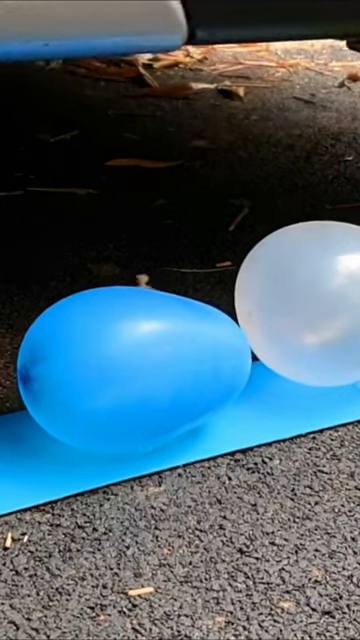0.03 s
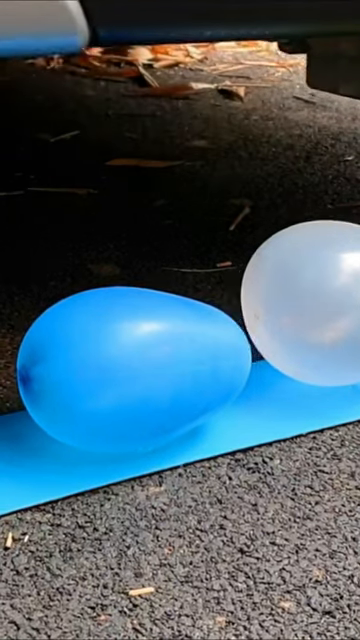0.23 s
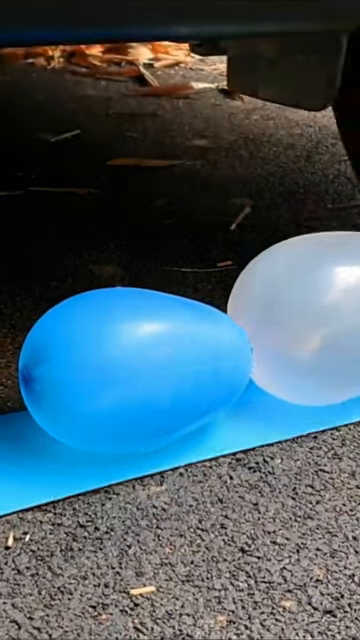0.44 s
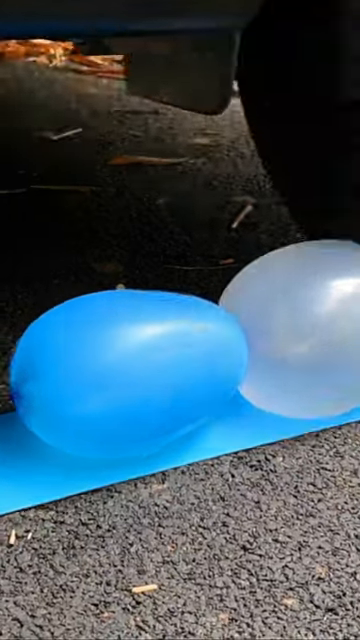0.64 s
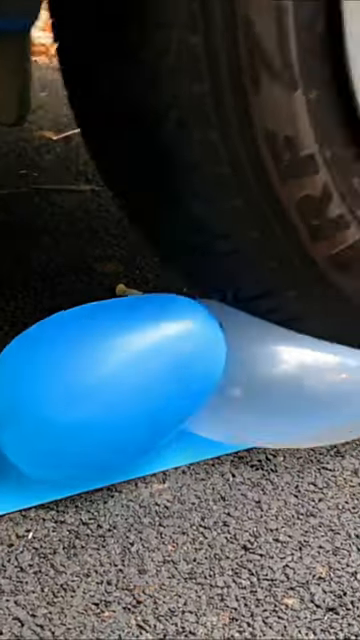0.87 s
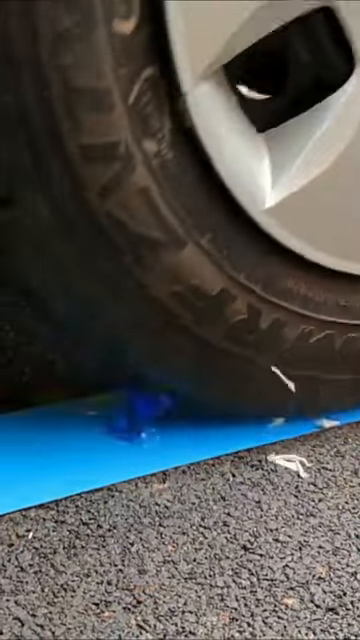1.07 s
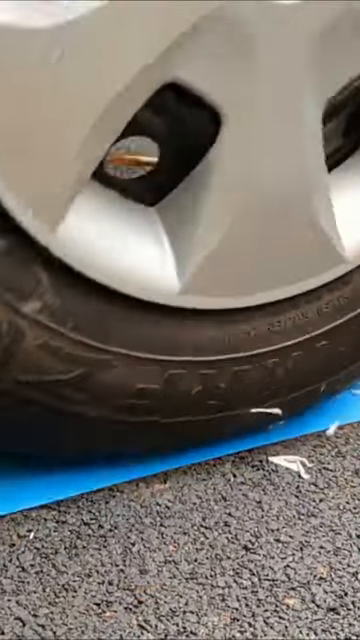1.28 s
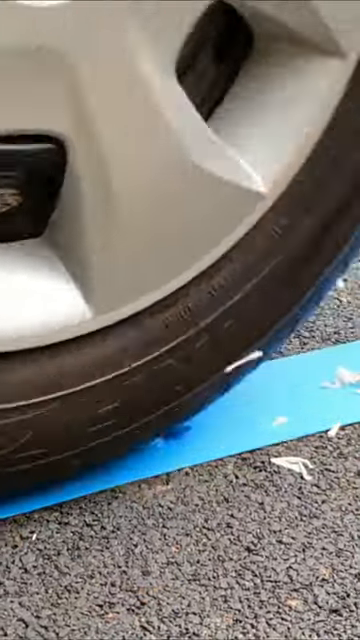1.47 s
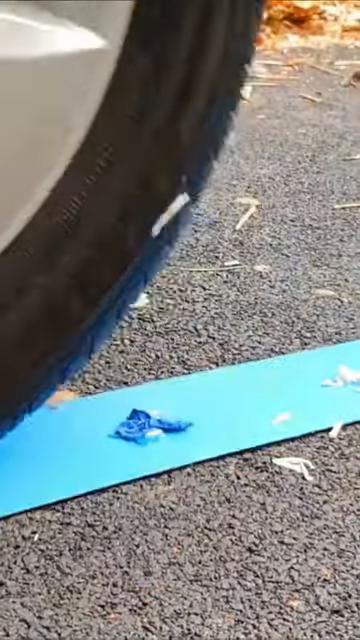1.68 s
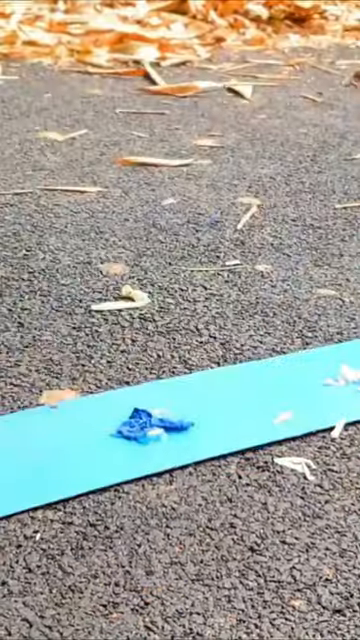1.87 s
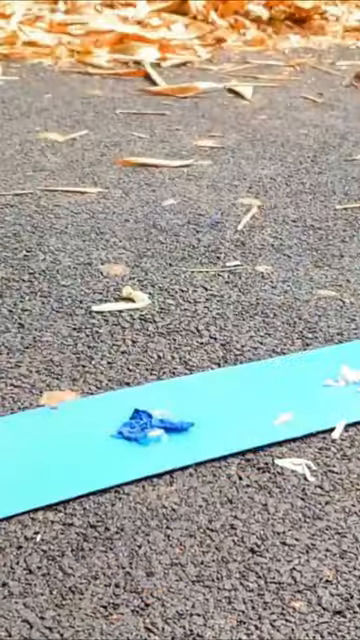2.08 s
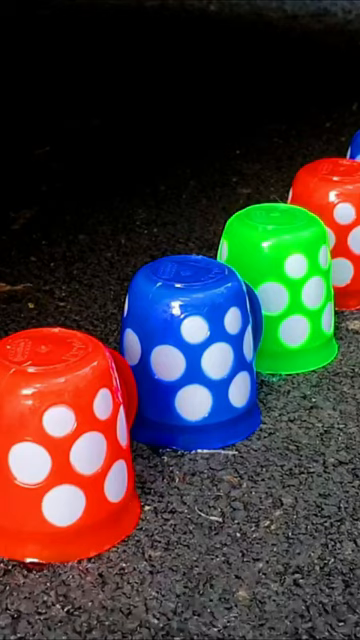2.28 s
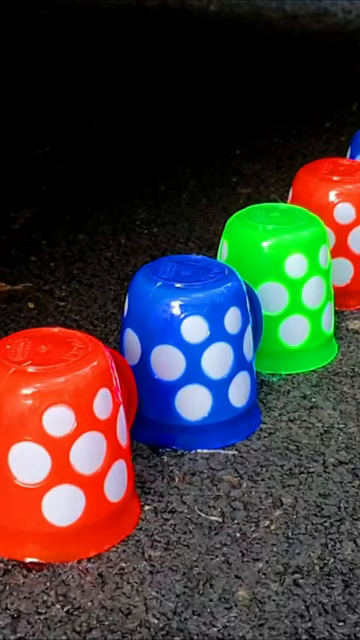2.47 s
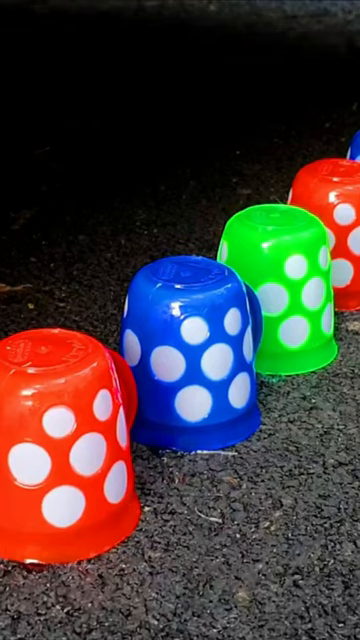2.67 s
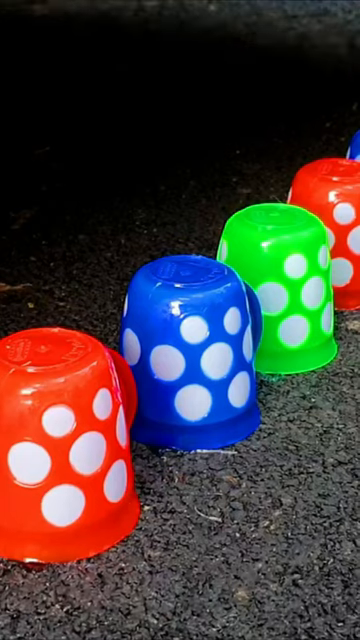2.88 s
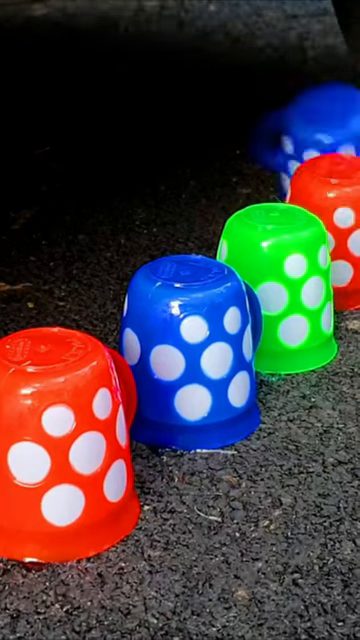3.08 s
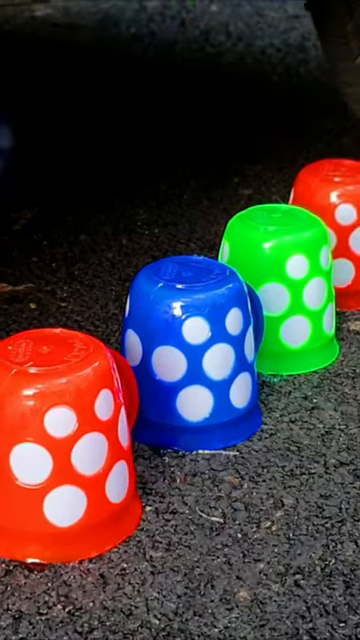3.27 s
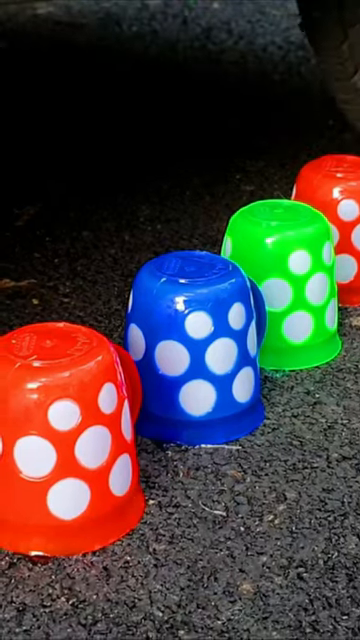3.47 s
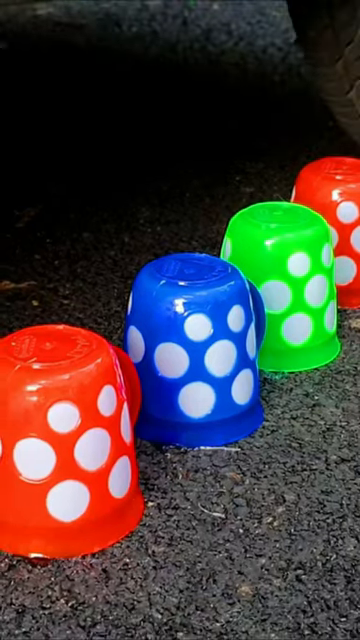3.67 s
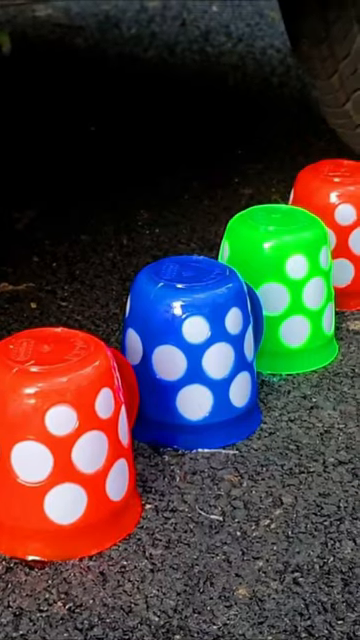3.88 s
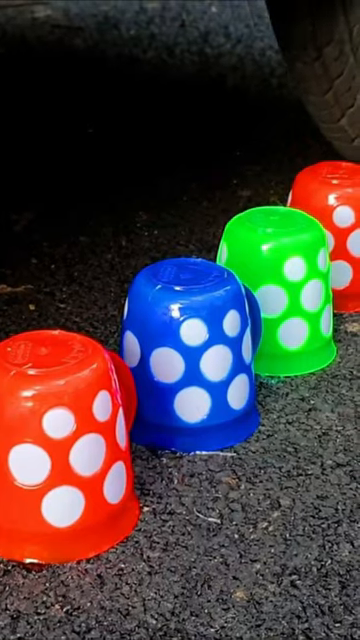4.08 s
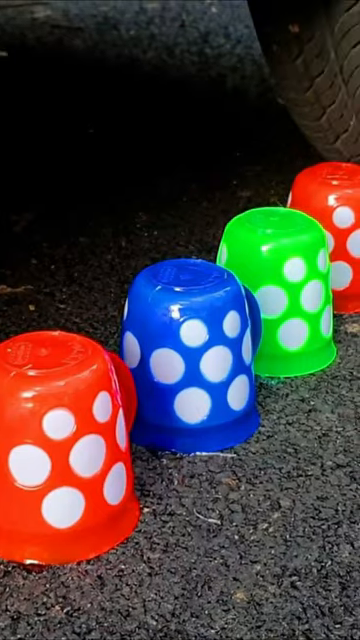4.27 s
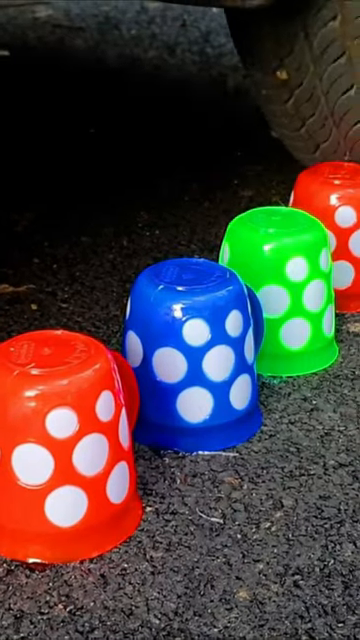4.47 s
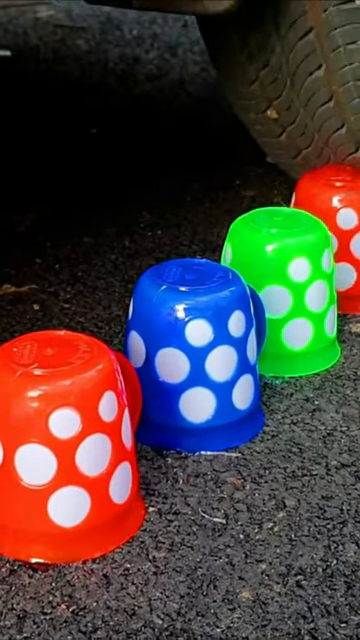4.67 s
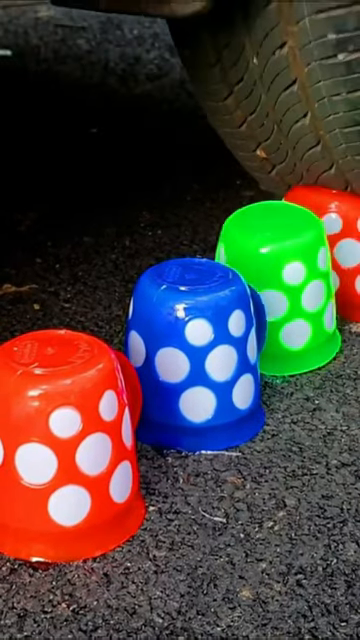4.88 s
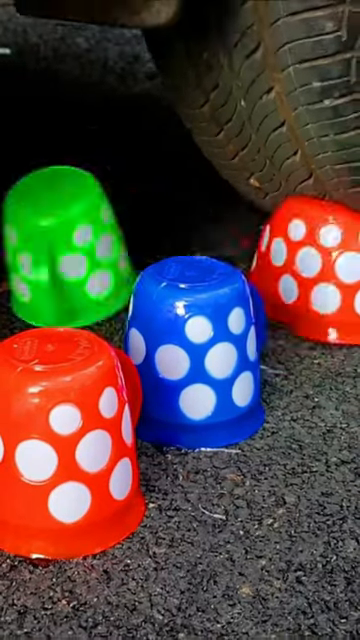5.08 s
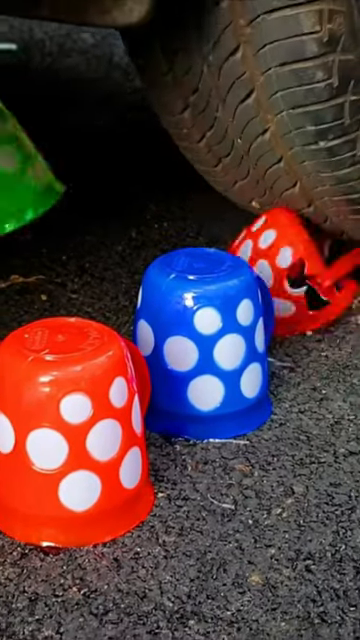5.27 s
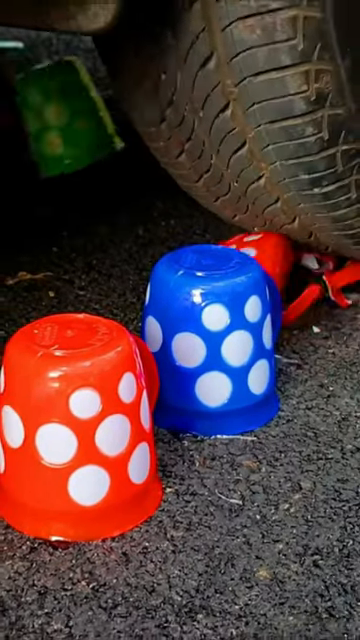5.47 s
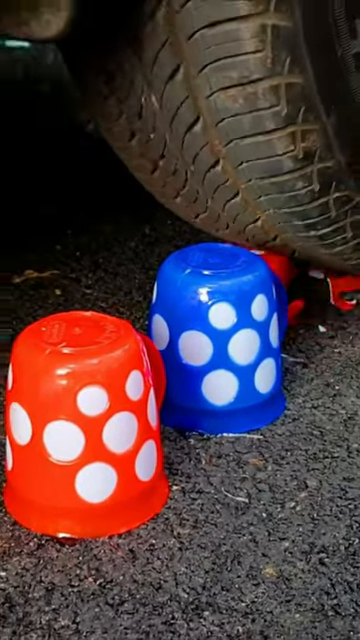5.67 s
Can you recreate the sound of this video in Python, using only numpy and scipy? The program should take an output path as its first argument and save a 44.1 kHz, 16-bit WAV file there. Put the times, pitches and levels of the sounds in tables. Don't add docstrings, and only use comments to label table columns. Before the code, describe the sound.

A low microphone beside a slowly rolling car catches soft engine throb, gritty ticks and three very loud balloon pops with limp skin slaps and thumps of air. The sound empties, cuts briefly to silence, then a stronger engine growl enters. Hard plastic crunches and snaps, loose bits knock on asphalt, and after a pause a second burst of dense cracking thins into scattered snaps as the engine revs higher.

```python
import sys
import numpy as np
from scipy import signal
from scipy.fft import rfft, irfft, next_fast_len
from scipy.io import wavfile
from scipy.ndimage import uniform_filter1d, map_coordinates

SR = 44100
rng = np.random.default_rng(int(sys.argv[2]) if len(sys.argv) > 2 else 0)


def put_to_file(sound):
    columns = np.atleast_2d(sound).T
    safe = np.clip(columns, -1, 1)
    whole_steps = np.round(safe * 32767)
    wavfile.write(sys.argv[1], SR, whole_steps.astype(np.int16))


def level_to_linear(level):
    exponent = np.asarray(level, float) / 20
    return 10 ** exponent


N = 253134
SHOT_ENDS_S, SHOT_STARTS_S = 2.358, 2.421
BLOW_LAG = 3
SIDES = np.array([[0.5], [-0.5]])

# f/Hz, level/dB
IDLING_TONE = [(13, -48.5), (22, -21), (38, -14), (64, 7), (90, -1.5), (125, 1), (150, -6), (180, -2.5),
               (205, -8.5), (228, -3), (285, -8.5), (390, -26), (500, -24), (650, -56.5), (1100, -120)]
# f/Hz, level/dB
PULLING_TONE = [(13, -33.5), (22, -32.5), (54, 0), (72, 7), (98, -5.5), (124, 1), (150, -4.5), (178, -3),
                (211, -10), (281, -11), (365, -22.5), (500, -33), (650, -53.5), (1100, -120)]
# f/Hz, level/dB
DRONE_TONE = [(250, -35.5), (420, -6.5), (516, -6), (944, -7.5), (1250, -14.5), (1600, -12), (2150, -22),
              (2800, -31), (3640, -39.5), (6160, -120)]
# f/Hz, level/dB
FAN_TONE = [(1180, -26), (1900, -3), (2900, -10), (4100, 0), (5200, -1), (7300, -17.5), (10000, -15),
            (12500, -23), (15000, -30.5)]
# f/Hz, level/dB
PIPE_TONE = [(40, -120), (70, -40), (98, -5), (112, 0), (130, -1.5), (150, -8), (175, -11), (230, -38),
             (500, -120)]
# f/Hz, likeness/0..1
LIKENESS = [(60, 1), (240, 0.39), (950, 0.61), (3770, 0.44), (15000, 0.055)]
# t/s, f/Hz
FIRING_RATE = [(1.5, 23.3), (1.85, 21.6), (2.36, 21.8), (2.42, 37.4), (2.49, 34.7), (2.67, 28.7),
               (2.76, 26.9), (2.98, 26), (3.4, 24.3), (3.8, 23.2), (4.05, 26.8), (4.18, 32.4), (4.38, 37),
               (4.65, 42.4), (4.82, 43.9), (5.74, 47)]
# t/s, exhaust level/dB, fan level/dB, drone level/dB
CAR_PASSING = [(0, -58, -70.5, -66), (.34, -59.5, -57, -67.5), (.69, -57.5, -74, -63.5),
               (1.0, -73.5, -80, -76.5), (1.35, -68, -86, -77.5), (1.75, -68.5, -88, -85),
               (1.9, -77, -90, -82.5), (2.1, -75.5, -90.5, -89), (2.25, -70.5, -86, -90),
               (2.36, -69.5, -86.5, -88.5)]
CAR_CREEPING = [(2.42, -44.5, -71.5, -61.5), (2.46, -43, -50.5, -52), (2.58, -41.5, -56, -57),
                (2.7, -45.5, -63, -59), (2.78, -47, -65.5, -57.5), (3.1, -47.5, -67, -55),
                (3.8, -61.5, -73, -68.5), (4.2, -52, -77, -68.5), (4.48, -52, -76.5, -68),
                (4.63, -52, -70, -63.5), (4.82, -52.5, -77.5, -66.5), (5.35, -53.5, -66.5, -57.5),
                (5.6, -57, -60.5, -59), (5.74, -55, -49.5, -58)]
# t/s, level/dB
THROTTLE_BOOM = [(2.42, -45), (2.54, -53), (2.66, -41), (2.735, -41), (2.775, -66.5), (4.15, -70.5),
                 (4.35, -52), (4.56, -54), (4.8, -66)]
# t/s, f/Hz, level/dB
BELT_SQUEAL = [(2.44, 2000, -80), (2.52, 1915, -65), (2.58, 1800, -72), (2.63, 1690, -64),
               (2.68, 1550, -62), (2.8, 1540, -63), (2.84, 1480, -74), (2.95, 1440, -90)]

# t/s, level/dB, body f/Hz, crack over body/dB, left-right/dB
TREAD_GRIT = [
    (.03, -51, 9500, -6, -1),
    (.229, -44, 2000, 7, 2),
    (.3115, -40, 3500, 7, -2),
    (.341, -48, 5000, -2, -3),
    (.364, -46, 4200, -2, 3),
    (.7175, -9, 2900, -12, -1),
    (1.0968, -23.5, 900, -12, 0),
    (1.0967, -16, 2414, -0.5, -2),
]
DISTANT_GRIT = [
    (1.4455, -59.5, 2320, -7.5, 6.3),
    (1.446, -59.5, 1170, -21, 2.3),
    (2.176, -72, 900, -12, 9.5),
]
# f/Hz, level/dB
CRACK_TONE = [(1060, -25), (1800, -8.5), (2500, -15), (3840, -4), (6070, -9.5), (7560, -21.5), (8280, -12),
              (11700, -21.5), (14300, -28.5), (16000, -38)]
# t/s, level/dB, f/Hz,
# length/cycles, left-right/dB
EDGE_SNAPS = [(.2312, -42, 1100, 1.8, 2), (.2308, -34, 3450, 3, 2), (.3132, -37, 2300, 2.2, -2),
              (.313, -28, 5150, 4, -5), (.3128, -31, 9400, 5, 2), (3.2552, -7, 4800, .7, 1),
              (3.6055, -21, 5000, .7, 14), (3.6056, -33, 11000, 1, 14), (4.8505, -14, 5000, 5, 0),
              (5.0002, -8, 3700, 1.6, 0), (5.0004, -17, 8700, 2.5, 5), (5.0187, -7, 4750, 2.2, 0),
              (5.0189, -19, 9000, 2, 5), (5.0355, -10, 3100, .8, .6), (5.1026, -12, 3700, .7, 1.5),
              (5.1462, -6, 4100, .7, .6), (5.1464, -20, 9500, 1.5, 5), (5.1648, -9, 4200, 2, -1.1),
              (5.2098, -24, 11000, 3, 5), (5.4512, -33, 12500, 4, 0), (5.5192, -2.5, 4300, .7, 3),
              (5.5195, -16, 8500, 1.6, 5), (5.6384, -5, 4100, 1.3, 0), (5.6387, -16, 8200, 1.8, 5),
              (3.1712, -8, 750, .7, 1), (3.2105, -15, 1900, .6, 1), (3.4268, -29, 6000, 1.2, 0),
              (3.8996, -7, 2700, .6, 12), (3.9235, -40, 7500, .8, 11), (3.9685, -35, 8000, .7, 8),
              (5.0388, -8, 2600, .8, 1), (5.091, -32, 3800, 1.5, 1), (5.2096, -10, 4200, .6, 2),
              (5.2335, -19, 3300, .8, 1), (5.2625, -19, 4000, .7, 1), (5.2897, -23, 3800, .7, 1)]

# f/Hz, level/dB
PIECE_TONE = [(1290, -14), (2200, -13.5), (3170, -4.5), (3870, -6), (4420, -0.5), (5000, 2), (6110, -13),
              (11100, -13.5), (16000, -53)]
# t/s, level/dB, body f/Hz, crack over body/dB
BOUNCED_PIECES = [(3.414, -12.5, 1030, -25), (3.421, -21, 1000, -10), (3.469, -16, 940, -30.5),
                  (3.481, -29.5, 920, -37.5), (3.528, -23.5, 1150, -15), (3.531, -19.5, 1274, -10),
                  (3.592, -12.5, 1830, -32), (3.599, -22, 1750, -25.5), (3.606, -30, 1740, -17),
                  (3.647, -17.5, 1310, -32), (3.659, -33, 1350, -13.5), (3.666, -25.5, 1490, -17.5),
                  (3.705, -36, 1050, -29), (3.715, -42, 960, -10), (3.732, -38, 1190, -6),
                  (3.767, -24.5, 1210, -12), (3.774, -40, 1117, 1.5), (3.857, -21, 1220, -55),
                  (3.864, -28.5, 1137, -36), (3.898, -4.5, 1884, -26), (3.905, -40.5, 1640, 4.5),
                  (3.923, -61, 2160, 14.5), (3.967, -29, 1400, -15.5), (3.98, -34, 2200, -25),
                  (4.006, -44, 1510, -25), (4.016, -36, 2300, -32), (4.023, -33, 1620, -29),
                  (4.042, -34, 1620, -17), (4.144, -19.5, 1468, -28.5), (4.143, -35.5, 820, -25),
                  (4.151, -40, 1500, -23)]
TYRE_KNOCKS = [(.564, -41, 885, -47), (0.579, -35, 870, -28), (.58, -36, 1330, -24),
               (.583, -38, 1960, -22), (.595, -40.5, 1790, -30), (1.109, -6, 621, -40.5),
               (1.6215, -16.5, 641, -42), (2.985, -36, 650, -35), (3.005, -25, 650, -40),
               (3.006, -32, 980, -42), (3.013, -38, 1430, -39), (5.319, -29, 1090, -21),
               (5.324, -27, 1420, -15), (5.385, -22.5, 1240, -14), (5.391, -31, 1210, -19),
               (5.45, -53.5, 1320, 7.5), (5.461, -7, 1395, -27), (5.468, -19, 1420, -37),
               (5.57, -45.5, 1590, 11.5), (5.682, -36, 1030, -34), (5.702, -29.5, 950, -30)]
THIN_SPLINTERS = [(3.427, -33, 5940, -33), (3.731, -45, 7160, -6), (3.735, -40, 10600, -12),
                  (3.8981, -8, 3775, -27.5), (3.8977, -17.5, 4940, -21.5), (3.9, -12.5, 1410, -29),
                  (3.922, -33.5, 4940, -16.5), (3.593, -24, 3700, -27), (3.968, -28, 2720, -24),
                  (3.97, -31, 3920, -22), (4.146, -31, 3710, -28), (5.163, -33, 4050, -9)]

# t/s, level/dB, body f/Hz, time to fall 60 dB/s, left-right/dB
BALLOON_BURSTS = [
    (0.718, 4, 1228, 0.0091, -0.4),
    (1.1089, 5, 967, 0.026, 4.5),
    (1.6215, 5, 1064, 0.02, 8.5),
]
# f/Hz, time to fall 60 dB/s
UNDERBODY_LIFE = [(200, .08), (500, .15), (900, .36), (1500, .42), (4000, .4), (8000, .36), (12000, .31),
                  (16000, .24)]
# f/Hz, level/dB
BANG_ECHO_TONE = [(120, -50), (200, -13.5), (283, -17.5), (400, -17), (560, -8), (750, -2), (1080, -1),
                  (1420, -5.5), (1560, -12), (3970, -16.5), (6760, -25), (10500, -25.5), (16000, -31)]
# f/Hz, level/dB, swell/s, growth of swell with slowness
GAP_MODES = [(59.4, -0.2, 0.0063, 0.95), (115, -6.5, 0.0095, 1), (185.1, 1.5, 0.0042, 0.039),
             (289, -0.5, 0.0024, 0.054)]
# t/s, level/dB, tilt per mode/dB, slowness/s, left-right/dB
AIR_PUFFS = [
    (0.7202, -5.5, -7, -.0006, -5),
    (1.0972, -27, 1, .0003, 1),
    (1.107, -18, -8, .0005, 15),
    (1.621, -14.5, -12.5, .0005, 4.5),
    (3.16, -25.5, 5, .014, 0),
    (3.257, -24, 1, .017, 3),
    (4.922, -28, 3.5, .012, -2),
    (5.142, -35, -2.5, 0.00018, -30.5),
    (5.635, -29.5, -5.5, -0.0046, -17.5),
]

# t/s, level/dB, sag/dB per s, length/s
CUP_CRUSH = [
    (3.153, -23.5, 119, 0.093),
    (3.252, -16.5, 232, 0.94),
    (4.846, -34, 123, 0.068),
    (4.918, -24.5, 73.5, 0.24),
]
# f/Hz, level/dB
WALL_TONE = [(59, -29.5), (100, 1), (184, -0.5), (482, -15.5), (620, -5.5), (2750, -27.5), (2990, -26),
             (4940, -18.5), (6480, -33.5), (15000, -41.5)]
# t/s, level/dB, body f/Hz, crack over body/dB, time to fall 60 dB/s
FIRST_CUP_BREAKS = [(3.157, 1.5, 668, -10, 0.051), (3.157, -8, 1800, -21.5, 0.02),
                    (3.2545, -8, 1800, -19.5, .03), (3.163, -10.5, 604, -19.5, 0.017),
                    (3.17, -8.5, 527, -35, 0.1), (3.208, -11, 730, -18.5, 0.069),
                    (3.24, -13, 605, -29.5, 0.027), (3.2535, -5.5, 862, -8.5, 0.059),
                    (3.261, -6.5, 920, -6.5, 0.025), (3.272, -12, 1650, -17.5, 0.04),
                    (3.282, -15, 676, -19, 0.024), (3.295, -19, 565, -10, 0.021),
                    (3.296, -22.5, 1780, -18, 0.01), (3.317, -25.5, 1700, -10.5, 0.017)]
SECOND_CUP_BREAKS = [(4.847, 1, 1097, -9.5, 0.033), (4.848, -14, 565, -30, 0.035),
                     (4.922, 0.5, 885, -13, 0.049), (4.9242, -17.5, 600, -7, 0.04),
                     (4.927, -1, 1405, -13, 0.033), (4.936, -7, 624, -18, 0.074),
                     (4.943, -12, 820, -33.5, 0.015), (4.949, -7.5, 900, -10, 0.023),
                     (4.977, -17, 900, -29, 0.024), (4.98, -34.5, 620, -10, 0.022),
                     (4.996, -23, 1600, -27, 0.017), (4.999, -13, 1612, -3, 0.036),
                     (5.0143, -6, 1083, -38, 0.022), (5.017, -9, 1555, -2.5, 0.042),
                     (5.034, -11.5, 1028, -11.5, 0.057), (5.037, -5, 1640, -13.5, 0.021),
                     (5.056, -19, 820, -18, 0.045), (5.063, -14, 870, -32, 0.042),
                     (5.1015, -17.5, 974, -2.5, 0.03)]
CUP_FLATTENS = [(5.145, -11.5, 800, 1.5, 0.036), (5.161, -14.5, 1070, -20.5, 0.037),
                (5.184, -27, 900, -24, .03), (5.163, -19.5, 1020, 6, 0.036), (5.209, -11, 1030, 1, 0.019),
                (5.213, -16.5, 1220, -10.5, 0.014), (5.215, -11, 1074, -7, 0.039),
                (5.22, -20, 1010, -8, 0.006), (5.2314, -21, 1010, -2.5, 0.031),
                (5.236, -25.5, 950, -23, 0.035), (5.261, -24, 1140, 1, 0.045),
                (5.289, -22, 1107, -4, 0.065), (5.5183, -13.5, 1540, -1, 0.028),
                (5.523, -23, 1620, -4.5, .03), (5.6378, -16.5, 810, 2.5, 0.027),
                (5.641, -24, 1100, 1, 0.053), (5.646, -28, 898, -10.5, 0.13)]


def unit(x):
    return x / np.sqrt(np.mean(x ** 2) + 1e-20)


def along(points, hz):
    f, v = np.transpose(points)
    return np.interp(np.log(hz + 1), np.log(f + 1), v)


def curves(rows):
    s, *columns = np.transpose(rows)
    return [np.interp(np.arange(N) / SR, s, column) for column in columns]


def wobble(rate):
    knots = rng.standard_normal(int(N * rate / SR) + 4)
    return map_coordinates(knots, [np.arange(N) * rate / SR])


def add_at(out, start, sound):
    out[:, start:][:, :sound.shape[-1]] += sound


def coloured(x, spectrum):
    length = x.shape[-1]
    m = 2 * next_fast_len(length // 2 + min(4096, length // 4))
    gain = level_to_linear(along(spectrum, np.fft.rfftfreq(m, 1 / SR))) + 1e-5
    cepstrum = irfft(np.log(gain), m)
    cepstrum[1:m // 2] *= 2
    cepstrum[m // 2 + 1:] = 0
    return irfft(rfft(x, m) * np.exp(rfft(cepstrum)), m)[..., :length]


def rush(spectrum, patchy_db):
    hz, _, z = signal.stft(rng.standard_normal((2, N + 512)), SR, nperseg=512)
    patches = uniform_filter1d(rng.standard_normal(z.shape[1:]), 6, 0)
    patches = uniform_filter1d(patches, 10, 1)
    turn = np.arccos(np.clip(along(LIKENESS, hz), -1, 1))[:, None] / 2
    mid, side = z[0] * np.cos(turn), z[1] * np.sin(turn)
    pair = np.array([mid + side, mid - side]) * level_to_linear(patchy_db * unit(patches))
    pair = signal.istft(pair, nperseg=512)[1]
    return unit(coloured(pair[:, :N], spectrum))


def exhaust(firing):
    ports = np.array([firing, firing])
    pulling = unit(unit(coloured(ports, PULLING_TONE)) + 0.4 * rush(PULLING_TONE, patchy_db=1.5))
    idling = unit(unit(coloured(ports, IDLING_TONE)) + 0.8 * rush(IDLING_TONE, patchy_db=2))
    return np.where(np.arange(N) < SHOT_STARTS_S * SR, idling, pulling)


def belt():
    hz, db = curves(BELT_SQUEAL)
    turns = np.cumsum(hz * (1 + 0.03 * wobble(120))) / SR
    return level_to_linear(db + 2 + 4 * wobble(50)) * np.sin(2 * np.pi * turns)


def heat_shield(engine_db):
    turns = np.cumsum(277 * (1 + 0.015 * wobble(20))) / SR
    buzz = level_to_linear(2.5 * wobble(25)) * np.sin(2 * np.pi * turns)
    return level_to_linear(-55 + 3.5 * (engine_db + 43.5)) * buzz


def car():
    (rate,), (engine_db, fan_db, drone_db) = curves(FIRING_RATE), curves(CAR_PASSING + CAR_CREEPING)
    turns = np.cumsum(rate * (1 + 0.008 * wobble(14))) / SR
    firing = np.diff(np.floor(turns), prepend=0) * level_to_linear(0.7 * wobble(33))
    second_shot = np.arange(N) > SHOT_STARTS_S * SR
    breath = level_to_linear(1.5 * np.cos(2 * np.pi * turns))
    drone = level_to_linear(drone_db) * breath * rush(DRONE_TONE, patchy_db=1.6)
    boom = level_to_linear(curves(THROTTLE_BOOM)[0]) * unit(coloured(firing, PIPE_TONE)) * second_shot
    fan = level_to_linear(fan_db) * rush(FAN_TONE, patchy_db=1.2)
    throb = level_to_linear(engine_db + 0.95 * wobble(5)) * exhaust(firing)
    left, right = throb + drone + heat_shield(engine_db) + boom + fan
    return np.array([left, np.roll(right, shift=16)]) + belt() * second_shot


def blows(table, snap, width, ring_db, rattle_db, crack_life, rise_s):
    out, t = np.zeros((2, N + SR)), np.arange(SR // 10) / SR
    draws = rng.standard_normal((len(table), 6, len(t)))
    common = np.stack([np.roll(draws[:, 3], shift=BLOW_LAG, axis=1), draws[:, 3]], axis=1)
    spits = coloured(common + 0.8 * draws[:, 4:], snap)
    for (s, db, hz, crack_db, t60, pan_db), noise, spit in zip(table, draws, spits):
        ring = np.sin(2 * np.pi * hz * (t - SIDES * BLOW_LAG / SR))
        ring = ring * level_to_linear(-60 * t / (0.52 * t60)) * (1 - np.exp(-t / rise_s))
        hump = [(hz * np.exp(k * width), -4 * k * k * (0.6 if k < 0 else 1))
                for k in (-5, -3, -1.5, 0, 0.7, 1.5, 3, 5)]
        rattle = unit(coloured(noise[0] + 0.93 * noise[1:3], hump)) * level_to_linear(rattle_db - 60 * t / t60)
        crack = unit(spit) * (level_to_linear(-60 * t / (crack_life * t60)) + 3 * level_to_linear(-60 * t / 0.0022))
        blow = level_to_linear(ring_db) * ring + rattle + level_to_linear(crack_db - 4.5) * crack
        add_at(out, round((s + 0.001) * SR), level_to_linear(db + SIDES * pan_db) * blow)
    return out[:, :N]


def ticks(table):
    rows = [(*row[:4], 0.025, row[4]) for row in table]
    return blows(rows, CRACK_TONE, width=0.44, ring_db=0.5, rattle_db=-2, crack_life=0.6, rise_s=0.00018)


def snaps():
    out, t = np.zeros((2, N + SR)), np.arange(-128, 128) / SR
    for s, db, hz, cycles, pan_db in EDGE_SNAPS:
        swing = -np.cos(2 * np.pi * hz * t) * np.exp(-(t * hz / cycles) ** 2)
        add_at(out, round(s * SR) - 128, level_to_linear(db + SIDES * pan_db) * swing)
    return out[:, :N]


def pieces():
    groups = [(BOUNCED_PIECES, 5.5), (TYRE_KNOCKS, 2.5)]
    knocks = [(*row, 30 / row[2], pan_db) for group, pan_db in groups for row in group]
    thin = [(*row, 0.024, 10) for row in THIN_SPLINTERS]
    return (blows(knocks, PIECE_TONE, width=0.23, ring_db=-2, rattle_db=-9.5, crack_life=0.73, rise_s=0.00078)
            + blows(thin, PIECE_TONE, width=0.065, ring_db=-1.5, rattle_db=-9, crack_life=0.8, rise_s=0.0004))


def balloons():
    tears, flaps = [], []
    for s, db, hz, t60, pan_db in BALLOON_BURSTS:
        tears.append((s, db, hz, -7.5 * np.log(t60 / 0.0018), t60, pan_db))
        flap_db = db - 12 + 0.5 * np.log(t60 / 0.019)
        flaps.append((s + 0.0024, flap_db, 650, -13, 0.12, pan_db - 6.5))
    return (blows(tears, CRACK_TONE, width=0.54, ring_db=-0.5, rattle_db=-11, crack_life=0.36, rise_s=0.0001)
            + blows(flaps, CRACK_TONE, width=0.51, ring_db=-11, rattle_db=-9.5, crack_life=0.52, rise_s=0.0014))


def underbody(x, life):
    hz, t, z = signal.stft(rng.standard_normal((2, SR // 2)), SR, nperseg=256)
    wall = 1 + 0.7 * (t > 0.034) * (hz[:, None] > 2000)
    escape_db = 150 * t ** 2
    fade = level_to_linear(-60 * t / (life * along(UNDERBODY_LIFE, hz)[:, None]) - escape_db)
    tail = signal.istft(z * wall * fade, SR, nperseg=256)[1]
    tail = tail + 0.5 * tail[::-1]
    return signal.fftconvolve(x, tail / np.linalg.norm(tail[0]), axes=1)


def bang_echo(s, db):
    tail = coloured(underbody(np.full((2, 1), level_to_linear(db)), life=1), BANG_ECHO_TONE)
    return np.pad(tail, ((0, 0), (round(s * SR), N)))[:, :N]


def puffs():
    out, t = np.zeros((2, N + SR)), np.arange(SR // 6) / SR
    for s, db, tilt_db, slow, pan_db in AIR_PUFFS:
        for k, (hz, mode_db, quick, grows) in enumerate(GAP_MODES):
            swell = quick + grows * abs(slow)
            swing = np.sin(2 * np.pi * hz * t + np.array([[-0.2], [0.2]]))
            swing = (t / swell * np.exp(1 - t / swell)) ** 1.35 * swing
            level_db = db + mode_db + tilt_db * min(k, 2) - (k > 2) * 900 * abs(slow)
            add_at(out, round((s + k * slow) * SR), -level_to_linear(level_db + SIDES * pan_db) * swing)
    return out[:, :N]


def crush():
    size = level_to_linear(2.5 * rng.exponential(1, (2, N)).clip(0, 4))
    happens = rng.random((2, N)) < 4000 / SR
    slips = happens * rng.choice([-1, 1], (2, N)) * size
    wall = unit(coloured(slips[0] + 0.4 * slips[1] * [[1], [-1]], WALL_TONE))
    load = 0
    for s, db, sag, length in CUP_CRUSH:
        t = (np.arange(N) / SR - s).clip(0, 1)
        bite = 1 - np.exp(-t / 0.0015)
        load = load + level_to_linear(db - sag * t - 7.5 * (t / length) ** 3) * bite
    return load * level_to_linear(1.1 * wobble(90)) * wall


def cups():
    stages = [(FIRST_CUP_BREAKS, 2), (SECOND_CUP_BREAKS, 2.5), (CUP_FLATTENS, 2)]
    rows = [(*row, pan_db) for stage, pan_db in stages for row in stage]
    return blows(rows, CRACK_TONE, width=0.46, ring_db=-5, rattle_db=-8, crack_life=0.93, rise_s=0.000065)


def doubled(x, lead_db):
    lead = 768
    return x + level_to_linear(lead_db) * np.pad(x, ((0, 0), (0, lead)))[:, lead:]


def scene():
    cracks = cups() + snaps()
    knocks = ticks(TREAD_GRIT) + pieces()
    booms = bang_echo(0.7185, db=18.5) + bang_echo(1.11, db=15.5) + bang_echo(1.622, db=16.5)
    clatter = underbody(level_to_linear(-16.5) * cracks + level_to_linear(-14.5) * knocks, life=0.22)[:, :N]
    clatter_tone = [(300, 6), (1200, -0.5), (5000, -8), (8000, -20.5), (16000, -29)]  # f/Hz, level/dB
    echoes = booms + coloured(clatter, clatter_tone)
    loud = balloons() + cracks + knocks + crush() + echoes
    steady = doubled(car(), lead_db=-3) + doubled(ticks(DISTANT_GRIT), lead_db=-1.5)
    return doubled(loud, lead_db=-18.5) + doubled(puffs(), lead_db=-9.5) + steady


def low_pass(x):
    return signal.sosfilt(signal.butter(12, 16520, fs=SR, output="sos"), x)


def record(dry):
    t = np.arange(N) / SR
    shots = np.clip((SHOT_ENDS_S - t) / 0.004, 0, 1) + np.clip((t - SHOT_STARTS_S) / 0.003, 0, 1)
    x = (dry + level_to_linear(-99) * rng.standard_normal(dry.shape)) * shots
    x = x / (1 + np.abs(x) ** 8) ** (1 / 8)
    x = signal.sosfiltfilt(signal.butter(12, 15950, fs=SR, output="sos"), x)
    mix = np.clip(x, -1, 1)
    return low_pass(mix)


dry = scene()
out = record(dry)
put_to_file(out)
```